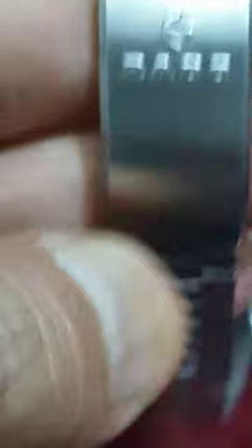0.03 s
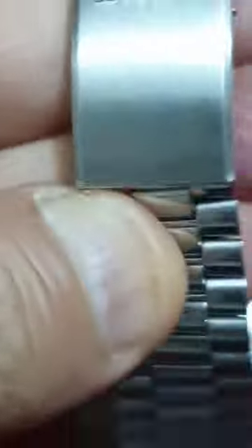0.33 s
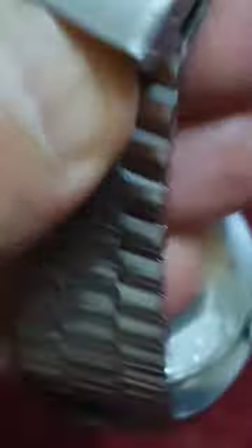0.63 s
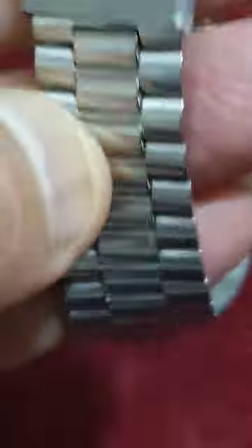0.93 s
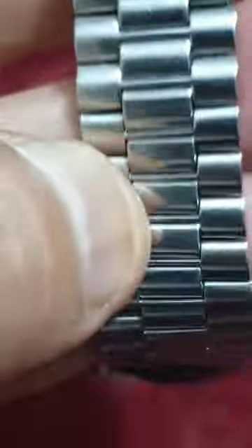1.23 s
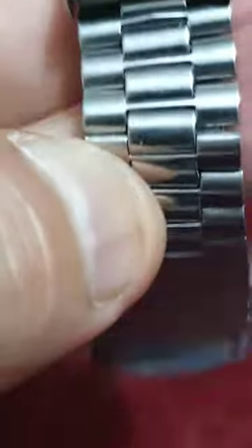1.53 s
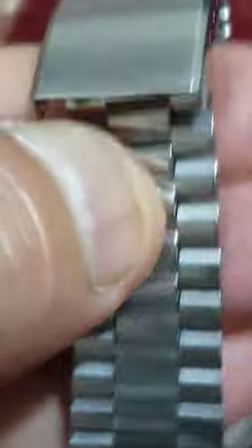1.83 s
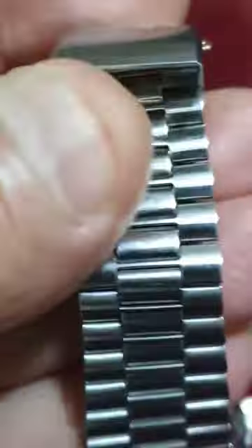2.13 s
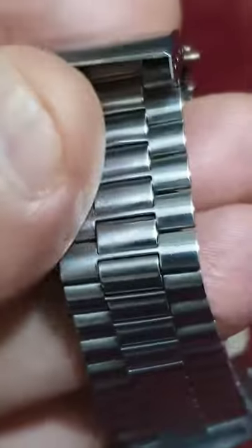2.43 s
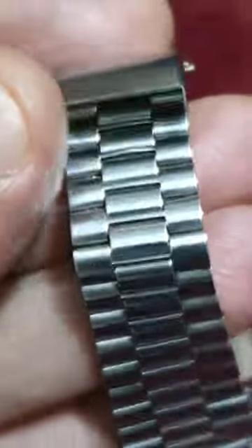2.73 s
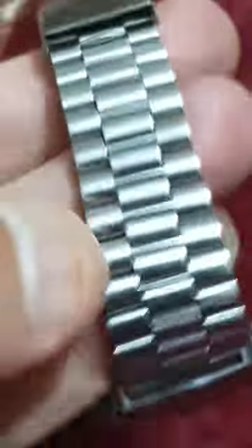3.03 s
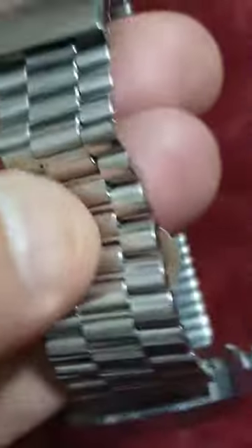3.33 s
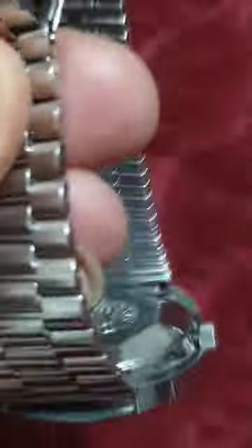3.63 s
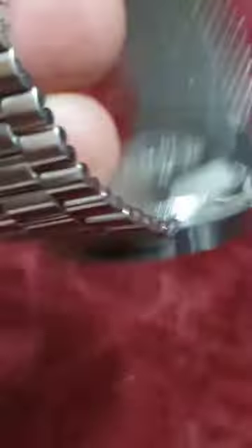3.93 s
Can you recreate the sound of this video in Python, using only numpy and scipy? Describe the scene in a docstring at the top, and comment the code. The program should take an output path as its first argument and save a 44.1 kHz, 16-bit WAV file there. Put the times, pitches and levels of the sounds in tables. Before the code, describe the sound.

Sharp clicks and short rattles of a steel watch band being handled close up.

```python
"""Sharp steel snaps and short rattles, close to the left microphone, over a quiet room's low rumble.
A watch bracelet is being turned over in the fingers: single links snap against their pins, the clasp
knocks, and runs of links slide and chatter. Steel scrapes softly on skin; near the end the case bumps.
The right microphone, farther off, hears the links quieter and a little later.
The room returns a soft bright tail, with a faint appliance hum and hiss underneath."""
import sys
import numpy as np
from scipy import signal
from scipy.fft import rfft, irfft
from scipy.io import wavfile

SR = 44100
rng = np.random.default_rng(int(sys.argv[2]) if len(sys.argv) > 2 else 0)


def to_wav(sig):
    """Store sig (one row per channel, or 1-D mono) as 16-bit WAV at the path in sys.argv[1].

    Samples outside -1..1 are clipped; the rate is SR.
    """
    pcm = np.clip(np.atleast_2d(sig), -1, 1) * 32767
    pcm = np.round(pcm).astype(np.int16)
    wavfile.write(sys.argv[1], SR, pcm.T)  # frames by channels


N = 176400
FAR_CLICK_DB, FAR_RATTLE_DB = -13, -9.5  # right microphone against the left
FAR_LIKENESS = .35  # correlation of contact noise between the microphones
LINK_DETUNE = .012  # no two links are pitched quite alike


def amp(db):
    """Decibels to gain."""
    return 10 ** (np.asarray(db) / 20)


def pan(right_db):
    """Gains for the microphone pair, the left at unity."""
    return amp([[0], [right_db]])


def unit(x):
    """Scales to rms 1."""
    return x / np.sqrt(np.mean(x ** 2) + 1e-20)


def colour(x, spectrum):
    """Filters by a curve of (f/Hz, level/dB) points."""
    hz, db = np.transpose(spectrum)
    f = np.fft.rfftfreq(x.shape[-1], 1 / SR)
    gain = amp(np.interp(np.log(f + 1), np.log(hz), db))
    return irfft(rfft(x) * gain, x.shape[-1])


def noise_pair(size, likeness=FAR_LIKENESS):
    """Partly alike white noise for the two microphones."""
    left, other = rng.standard_normal((2, size))
    return np.array([left, likeness * left + np.sqrt(1 - likeness ** 2) * other])


def add(mix, s, sound):
    """Adds a stereo sound at time s."""
    at = round(s * SR)
    part = mix[:, max(at, 0):max(at + sound.shape[1], 0)]
    part += sound[:, max(-at, 0):][:, :part.shape[1]]


def modes(table, size, pitch=1):
    """Struck metal: dying sines of total energy 1."""
    t = np.arange(size) / SR
    ring = sum(amp(db - 60 * t / t60) * np.sin(2 * np.pi * hz * pitch * t) for hz, db, t60 in table)
    return ring / np.linalg.norm(ring)


def room_tone():
    """The quiet room at both microphones: wavering rumble, even hiss and a faint appliance hum."""
    # spectra of the rumble and the hiss (f/Hz, level/dB)
    rumble_colour = [(12, -19), (30, -18.5), (48, -14), (66, 3), (82, -8.5), (98, 1), (118, -12.5),
                     (145, -6), (175, -19), (280, -28), (500, -48.5), (1500, -82)]
    hiss_colour = [(30, -63), (200, 16.5), (350, 8.5), (700, 6.5), (1200, 2.5), (2000, 2.5), (3000, 1.5),
                   (4500, -3), (6200, -2.5), (7300, -11.5), (8300, -14), (10000, -5), (12000, 1),
                   (14000, -1), (15700, -9.5)]
    # rise and fall of the rumble (t/s, relative level/dB)
    rumble_level = [(0.0, -38), (0.1, -32.5), (0.26, -39), (0.53, -33.5), (0.65, -45.5), (0.73, -36),
                    (0.77, -51.5), (0.88, -33), (0.91, -40.5), (1.16, -35), (1.38, -41.5), (1.48, -37.5),
                    (1.59, -47.5), (1.74, -38), (1.8, -49.5), (1.97, -39), (2.05, -47), (2.18, -40),
                    (2.26, -46), (2.33, -38), (2.48, -39.5), (2.55, -33), (2.73, -41.5), (3.66, -37.5),
                    (3.79, -46.5), (3.85, -31.5), (3.98, -39), (4.0, -44)]
    # the appliance's tones (f/Hz, level/dB)
    hum_lines = [(446.8, -65), (1647, -66.5), (1868, -71.5)]
    t = np.arange(N) / SR
    swell = amp(3 + np.interp(t, *np.transpose(rumble_level)))
    rumble = swell * unit(colour(noise_pair(N, likeness=.81), rumble_colour)) * pan(-3.5)
    hiss = amp(-46.5) * unit(colour(noise_pair(N, likeness=.12), hiss_colour)) * pan(-1.5)
    hum = sum(np.sqrt(2) * amp(db) * np.sin(2 * np.pi * (hz * t + rng.random())) for hz, db in hum_lines)
    return rumble + hiss + hum


def link_ring(contact, bright_db):
    """A contact rings a steel link at its own pitch, the tick bright_db above the clack; rms 1."""
    # spectra of a link's lower clack and bright tick (f/Hz, level/dB)
    clack = [(300, -44), (1200, -51), (2600, -35), (3700, -24.5), (5150, -6), (5650, 4.5), (6550, 10),
             (7200, -7.5), (8200, -15), (12000, -37)]
    tick = [(3000, -22), (7400, -18), (8500, -2), (10200, 0), (11400, 0.5), (12600, 4), (13900, 4.5),
            (15000, 6.5), (15800, -7), (17500, -10)]
    detune = [1 + LINK_DETUNE * rng.uniform(-1.23, 1), 1]  # shifts the frequency column only
    clack, tick = np.multiply(clack, detune), np.multiply(tick, detune)
    return np.array([unit(unit(colour(side, clack)) + amp(bright_db) * unit(colour(side, tick)))
                     for side in contact])


def link_snap(s, level_db, bright_db, size=1024):
    """One hard contact of a link, damped at once by the fingers, with a little chatter after it."""
    rise_s, ring_s, chatter_s, chatter_db = .00028, .00058, .0022, -15
    strike_share = .22  # of the contact's energy, in the first impact
    t = (np.arange(size) - size // 8) / SR
    after = np.maximum(t, 0)
    decay = np.exp(-after / ring_s) + amp(chatter_db) * np.exp(-after / chatter_s)
    envelope = np.exp(np.minimum(t, 0) / rise_s) * decay
    strike, burst = unit(1. * (t == 0)), unit(envelope * noise_pair(size))
    contact = np.sqrt(strike_share) * strike + np.sqrt(1 - strike_share) * burst
    gain = amp(level_db) * np.sqrt(.001 * SR / size)  # level as if all energy fell in 1 ms
    return s + t[0], gain * link_ring(contact, bright_db) * pan(FAR_CLICK_DB)


def clasp_knock(s, level_db):
    """The plate of the folding clasp gives a short, lower knock under a snap."""
    # modes of the plate (f/Hz, level/dB, t60/s)
    plate_modes = [(2680, -2.5, 0.013), (3310, -7, 0.0098), (4380, -6.5, 0.01), (5050, 11.5, 0.016)]
    gain = amp(level_db) * np.sqrt(.001 * SR)  # level as if all energy fell in 1 ms
    return s, gain * modes(plate_modes, size=1024) * pan(FAR_CLICK_DB)


def link_rattle(s, swell_s, fade_s, level_db, bright_db):
    """A run of links slides: many tiny uneven knocks and some rubbing swell and fade around time s."""
    knocks_per_s, spread_db, grain_s, rub_share = 520, 2.2, .0005, .33
    edge_db = -29  # the envelope swell_s before and fade_s after its peak
    t = np.arange(-SR // 4, SR // 4) / SR
    envelope = amp(edge_db * np.where(t < 0, abs(t / swell_s) ** 3.4, abs(t / fade_s) ** 2.06))
    hits = rng.random(len(t)) < knocks_per_s / SR
    knocks = hits * amp(spread_db * np.minimum(rng.exponential(1, len(t)), 3))
    grains = unit(signal.lfilter([1], [1, -np.exp(-1 / (grain_s * SR))], knocks))
    contact = envelope * np.sqrt(rub_share + (1 - rub_share) * grains ** 2) * noise_pair(len(t))
    hz = np.arange(100, SR / 2, 300)
    ripple = np.c_[hz, rng.normal(0, 2, len(hz))]  # each run has its own spectral peaks and dips
    chatter = link_ring(colour(contact, ripple), bright_db)
    clack_share = 1 / np.hypot(1, amp(bright_db))
    ring = amp(-7) * clack_share * fine_ring(contact)
    gain = amp(level_db) * np.sqrt(np.mean(envelope ** 2))
    return s + t[0], gain * (chatter + ring) * pan(FAR_RATTLE_DB)


def fine_ring(contact):
    """The links' narrow modes ring on briefly after each knock."""
    # modes of a run of links (f/Hz, level/dB, t60/s)
    link_modes = [(5480, -9, .06), (5600, -7, 0.066), (5914, 5, 0.075), (6150, 2, .05), (6260, 2, 0.064)]
    ring = modes(link_modes, size=2048, pitch=1 + LINK_DETUNE * rng.uniform(-1.1, 1))
    return unit(signal.fftconvolve(contact, ring[None], axes=1)[:, :contact.shape[1]])


def room_tail(direct, build_s=.0049, t60_s=.5):
    """The room returns a diffuse tail to both microphones; it builds quickly and dies away."""
    # colour of the reflections (f/Hz, level/dB)
    tail_colour = [(3000, -5.5), (6000, -2), (9500, -2), (12000, 2.5), (14000, -4.5)]
    t = np.arange(SR // 2) / SR
    tail = rng.standard_normal((2, len(t))) * (1 - np.exp(-t / build_s)) * amp(-60 * t / t60_s)
    tail *= amp(-11.5) * pan(-6.5) / np.linalg.norm(tail[0])
    return signal.fftconvolve(colour(direct, tail_colour)[None], tail, axes=1)[:, :N]


def finger_scrapes():
    """The bracelet slips through the fingers in soft swells of friction noise, a little to the left."""
    # scrapes (t/s, length/s, level/dB)
    scrapes = [(0.755, 0.041, -36), (0.912, 0.033, -41.5), (1.901, 0.013, -42), (2.286, 0.024, -47),
               (3.72, 0.0089, -41), (3.847, 0.078, -42.5), (3.922, 0.014, -39)]
    # spectrum of steel on skin (f/Hz, level/dB)
    scrape_colour = [(800, -41), (1700, -7), (2700, -0.5), (3500, -6.5), (4400, 5.5), (5200, 0.5),
                     (7000, -4)]
    t = np.arange(N) / SR
    envelope = sum(amp(db) * np.exp(-(2 * (t - s) / length) ** 2) for s, length, db in scrapes)
    return envelope * unit(colour(noise_pair(N), scrape_colour)) * pan(-2.5)


def case_bump(s, level_db, decay_s):
    """The watch case bumps dully against the fingers."""
    # spectrum of the bump (f/Hz, level/dB)
    bump_colour = [(100, -16), (550, 13.5), (1000, -12), (1500, 9), (2500, -24), (6000, -26)]
    t = np.arange(N) / SR
    return s, amp(level_db) * np.exp(-t / decay_s) * unit(colour(noise_pair(N), bump_colour))


def scene():
    """The bracelet in the hand, close to the left microphone, with the room around it."""
    # single links snapping (t/s, level/dB, tick over clack/dB)
    snaps = [(0.038, -19.5, 1), (0.045, -13, 1.5), (.158, -27.5, -6), (.1827, -33, 3), (.2175, -38, -10),
             (.2629, -12.5, 1), (0.266, -16.5, 1), (0.2684, -14.5, 5), (0.3423, -30, -15),
             (0.3816, -27.5, -5), (.4976, -26, -21), (0.508, -33, -12), (.513, -26, -16),
             (.5354, -19.5, -11), (.5402, -21, -11), (0.5448, -23, -8), (.574, -29, -1), (.613, -37, -18),
             (.6285, -42, -18), (0.65, -36, -18), (0.6798, -25, -18), (.732, -21.5, -24),
             (0.7434, -16, -16), (.7484, -22, -16), (.7518, -13.5, -2), (0.7642, -22, -11), (0.767, -19, 0),
             (0.773, -23, 0), (0.857, -37, -8), (0.8826, -18.5, 4), (0.8848, -14.5, -1), (.8884, -20.5, -7),
             (.899, -20, 10), (.9194, -11, 5), (1.013, -25.5, -6), (1.0859, -22, -5.5), (1.2333, -28.5, 12),
             (1.28, -25, 22), (1.2823, -26, 27), (1.2953, -29.5, -4), (1.3463, -14.5, 3), (1.4165, -22, -8),
             (1.578, -36, 0), (1.5835, -18, -3), (1.5855, -15.5, 2), (1.595, -22, -8), (1.614, -25, 6),
             (1.6186, -19.5, 5), (1.6223, -21.5, 6), (1.889, -27, 25), (1.9036, -13, 10),
             (1.907, -14.5, 13), (1.9205, -31, 18), (1.9635, -31, 3), (2.2915, -34, 6), (2.8371, -18.5, 33),
             (2.8384, -19, 17), (2.9632, -25.5, 5.5), (3.4065, -26, 21), (3.409, -14, 11.5),
             (3.422, -27.5, -5), (3.541, -20, 15), (3.5434, -22, 17), (3.556, -37, 20), (3.572, -33, 23),
             (3.585, -30, 22), (3.606, -28, 15), (3.719, -25, 2), (3.8129, -27, 0), (3.8515, -25, 7),
             (3.8835, -25, 14), (3.8858, -33, 16), (3.8935, -23, 21), (3.898, -20, 24), (3.905, -33, 16),
             (3.9193, -24, -14), (3.9434, -15.5, 19), (3.9465, -10, 23)]
    # knocks of the clasp (t/s, level/dB)
    clasp_knocks = [(.0381, -27), (.044, -28), (.265, -41), (.7518, -34), (.7665, -45.5), (.8851, -45),
                    (0.9198, -28), (1.3462, -48), (3.7196, -33)]
    # runs of links sliding (peak t/s, swell/s, fade/s, level/dB, tick over clack/dB)
    link_runs = [(.05, 0.023, 0.02, -30, 11), (.22, 0.073, 0.33, -44, 5), (.385, 0.02, 0.1, -41, 6),
                 (0.509, 0.032, 0.022, -38.5, -4), (.54, 0.023, 0.025, -28.5, -2),
                 (.575, .015, 0.012, -32, 2), (.645, 0.052, 0.07, -41, -22),
                 (.754, 0.042, 0.028, -27.5, -6), (0.771, 0.016, 0.0073, -23, 1),
                 (0.87, 0.013, 0.029, -33, -2), (0.889, 0.011, 0.028, -26, 8),
                 (.917, 0.038, 0.023, -18.5, 10.5), (.96, 0.11, 0.078, -31.5, 20),
                 (1.318, 0.06, 0.026, -39, 8), (1.39, 0.025, 0.037, -33, 5), (1.45, 0.055, 0.034, -43.5, 1),
                 (1.589, 0.026, 0.02, -31, 9), (1.618, 0.0054, 0.0054, -27.5, 3),
                 (1.64, 0.011, 0.02, -34, 19), (1.891, 0.0014, 0.035, -27.5, 32),
                 (1.905, 0.012, 0.0082, -20.5, 13), (1.921, 0.0088, 0.0086, -31, 29),
                 (1.96, 0.018, 0.032, -37.5, 2), (2.29, 0.023, 0.063, -39.5, 8.5),
                 (2.841, 0.0031, 0.042, -34.5, 9), (2.969, 0.025, 0.13, -42, 9),
                 (3.408, 0.01, 0.043, -29.5, 13), (3.542, 0.032, 0.0096, -29, 21),
                 (3.579, 0.053, 0.075, -29, 22), (3.66, 0.036, 0.036, -42.5, 14),
                 (3.721, 0.026, 0.058, -41, 4.5), (3.851, 0.052, 0.041, -31.5, 15),
                 (3.897, 0.021, 0.028, -26.5, 19), (3.99, 0.092, 0.074, -40, 5)]
    mix, bracelet = room_tone() + finger_scrapes(), np.zeros((2, N))
    add(mix, *case_bump(3.918, level_db=-33, decay_s=.0024))
    for source, events in (link_snap, snaps), (clasp_knock, clasp_knocks), (link_rattle, link_runs):
        for event in events:
            add(bracelet, *source(*event))
    near, far = bracelet
    far = np.pad(far, (round(.0003 * SR), 0))[:N]  # reaches the right microphone 0.3 ms later
    return mix + np.array([near, far]) + room_tail(near)


def record(dry, cutoff_hz=15880):
    """The recorder's band limit."""
    taps = signal.firwin(401, cutoff_hz, window=("kaiser", 8), fs=SR)
    return signal.oaconvolve(dry, taps[None], "same")


dry = scene()
out = record(dry)
to_wav(out)
```